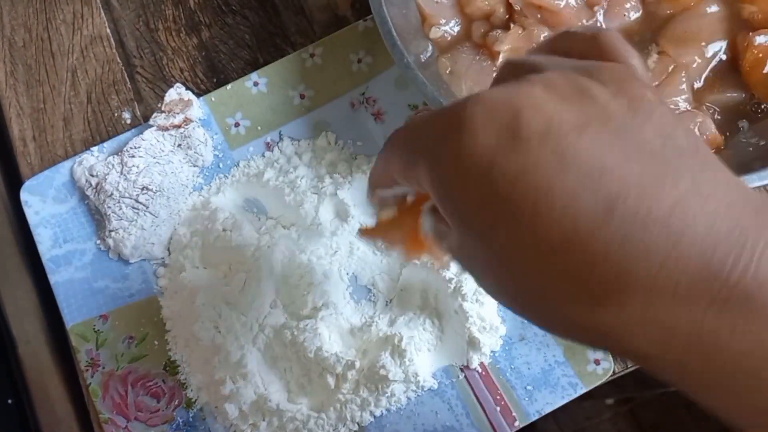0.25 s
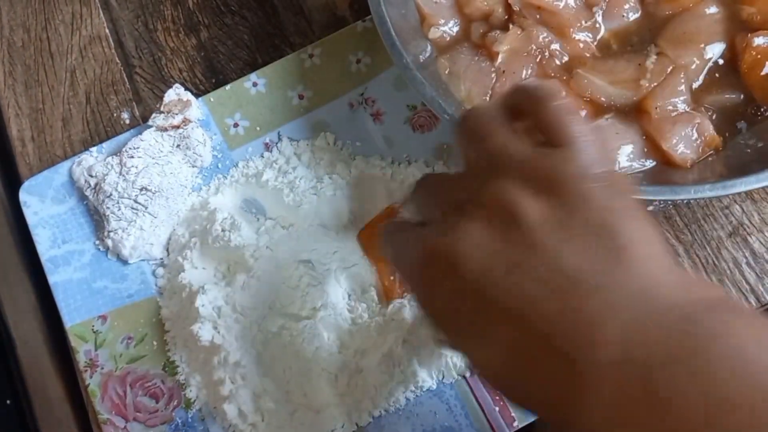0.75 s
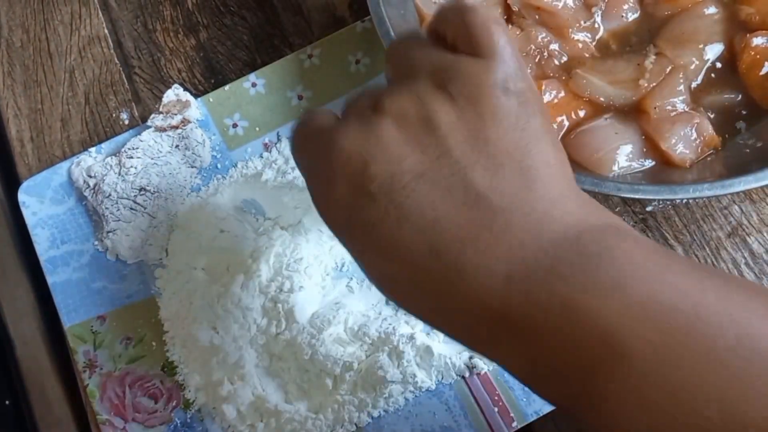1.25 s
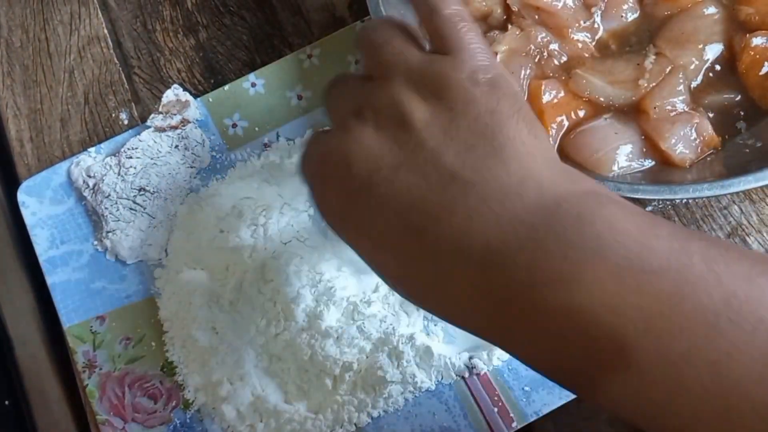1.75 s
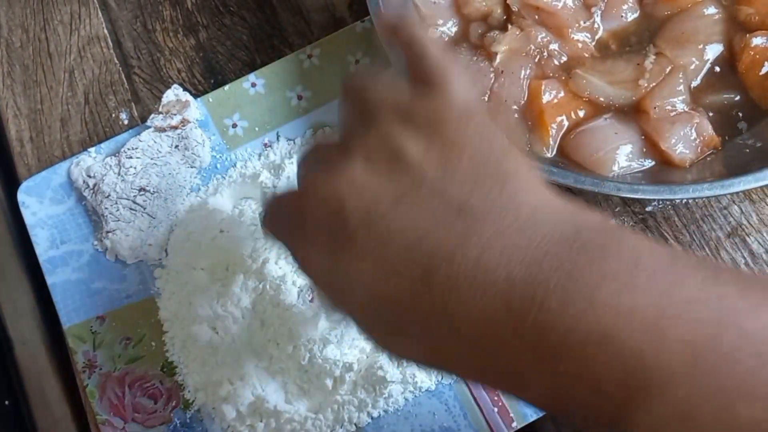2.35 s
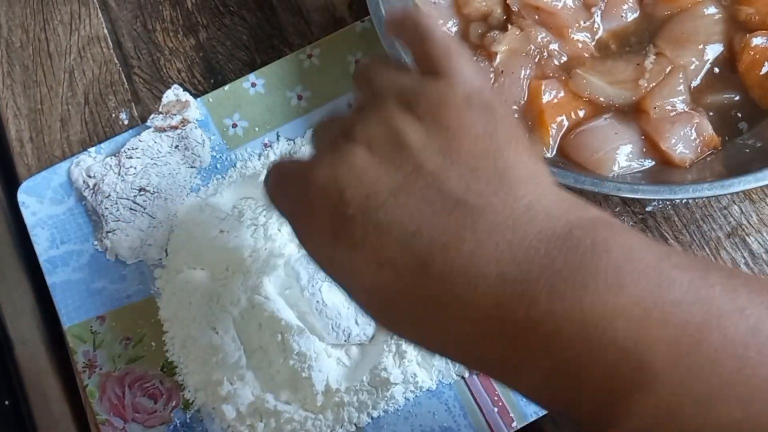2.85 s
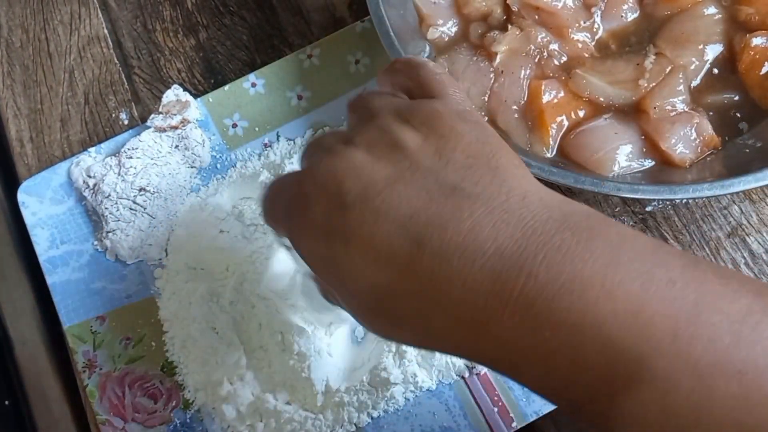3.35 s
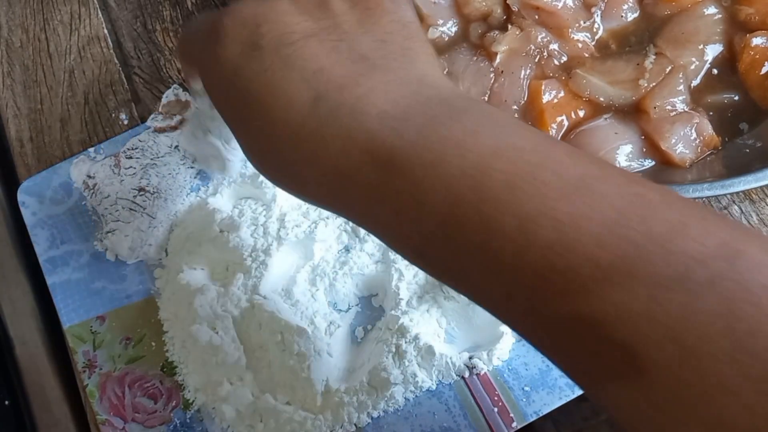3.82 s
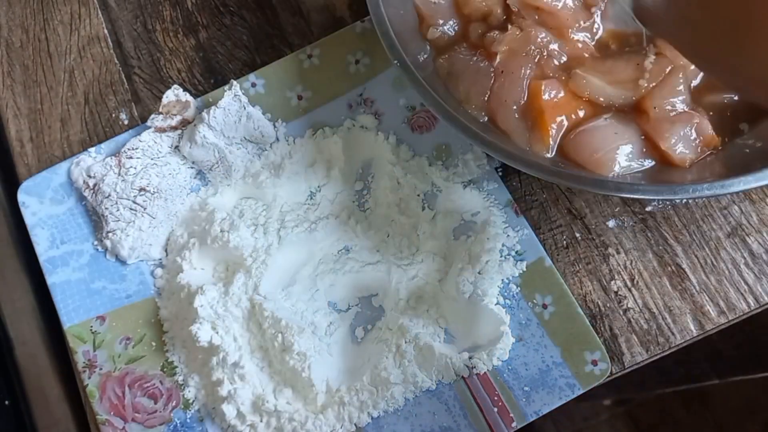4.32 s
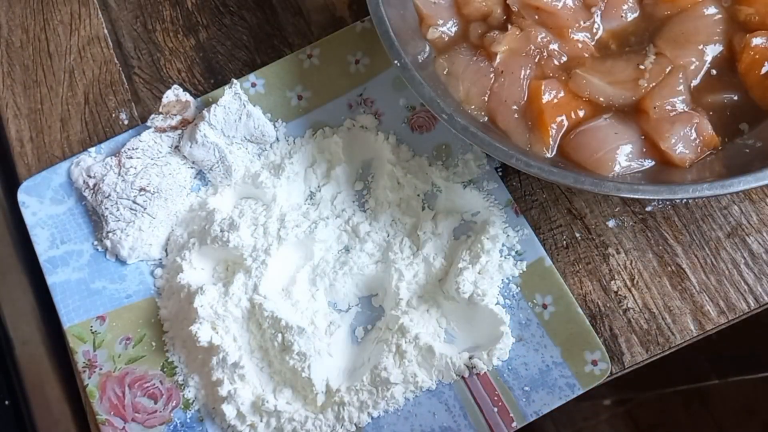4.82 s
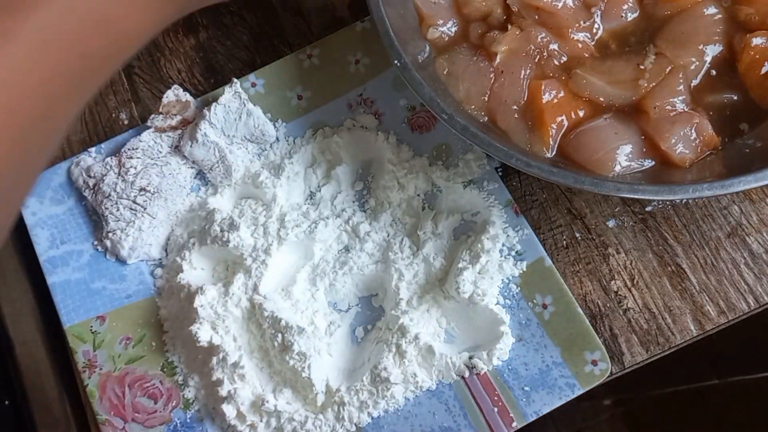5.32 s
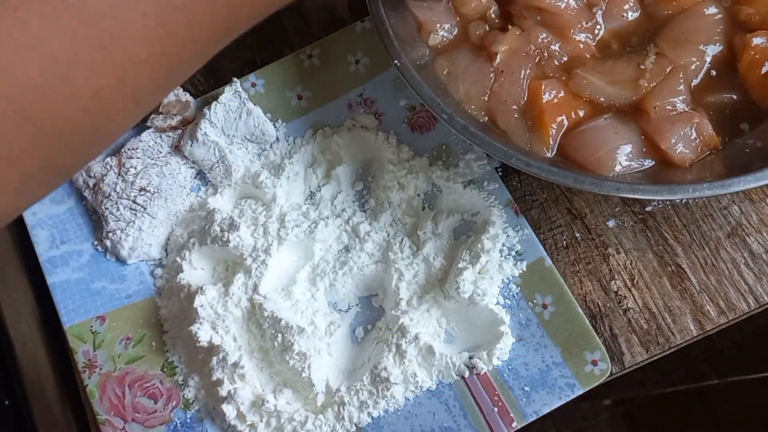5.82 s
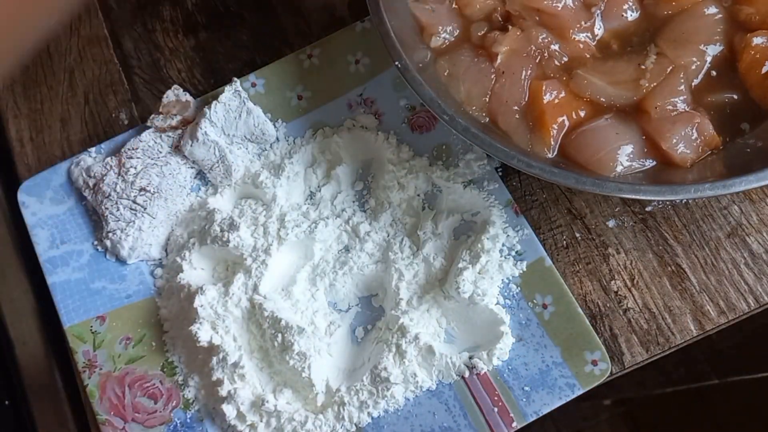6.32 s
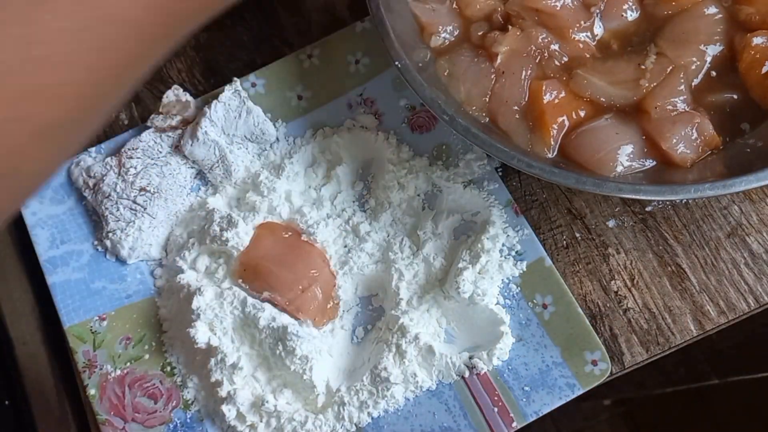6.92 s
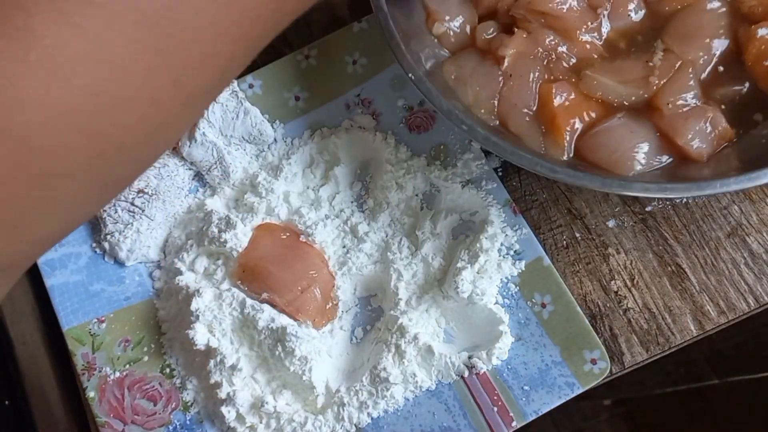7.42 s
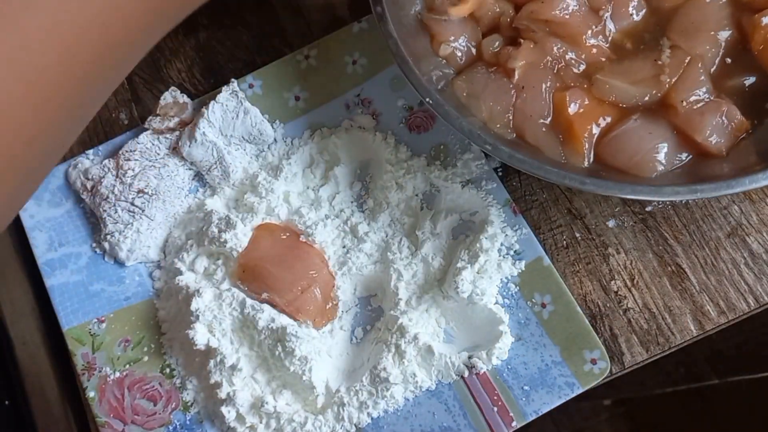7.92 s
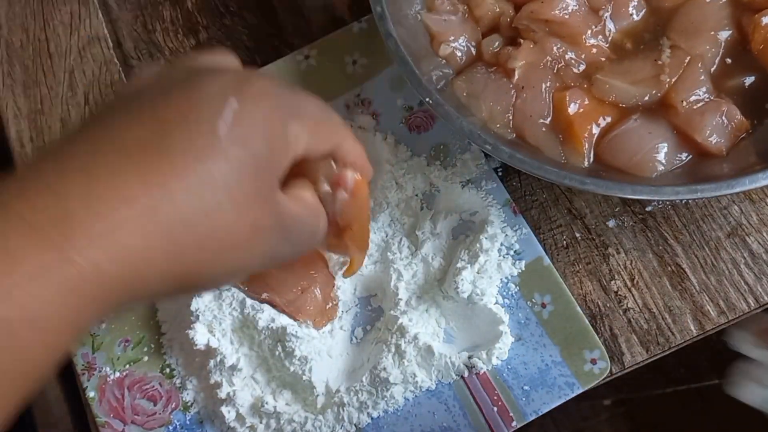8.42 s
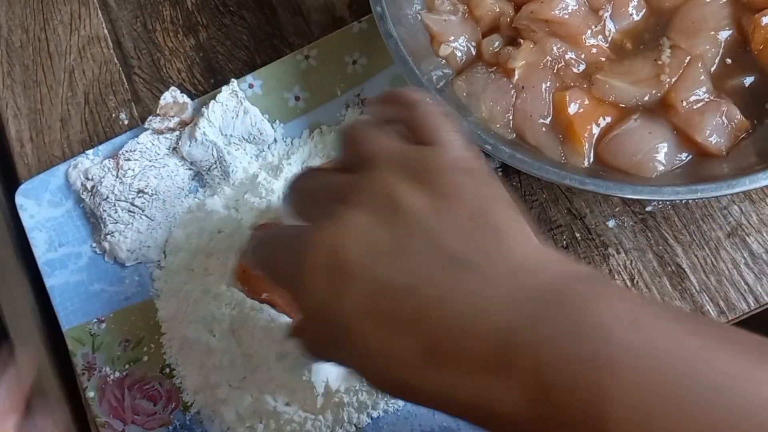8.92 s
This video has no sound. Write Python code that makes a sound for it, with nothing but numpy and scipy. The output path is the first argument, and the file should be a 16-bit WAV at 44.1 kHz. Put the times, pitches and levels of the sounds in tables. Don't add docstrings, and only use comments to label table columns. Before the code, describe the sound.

A small hard-walled kitchen, heard in stereo close to the sink. From 0 s to the end, at about 9 s, drops fall in rapid irregular clusters into standing water: crisp ticks, little sprays and high rising bubble pings, leaning left, with thin steel ringing and a short bright room tail. A muffled engine drones low through the walls, pulling suddenly around 2.5 s, more slowly toward 3.3 and 4.9 s with a hollow boom, then in weaker surges near 7 and 7.7 s before receding. A bright dry pop comes at 0.7 s; small wet meat smacks begin around 1.2 s and recur sparsely, gathering near 7 to 7.7 s, with a louder pop at 7.4 s. Starch swishes very faintly from 4.3 s, then softly at 5.1-5.6, 7.1 and 7.7-8.1 s. Light hiss lies beneath; drops continue to the end.

```python
import sys
import numpy as np
from scipy import signal
from scipy.io import wavfile
from scipy.ndimage import uniform_filter1d

SR = 44100
rng = np.random.default_rng(int(sys.argv[2]) if len(sys.argv) > 2 else 0)


def put_to_file(sound):
    columns = np.atleast_2d(sound).T
    safe = np.clip(columns, -1, 1)
    whole_steps = np.round(safe * 32767)
    wavfile.write(sys.argv[1], SR, whole_steps.astype(np.int16))


def ratio_of_db(decibels):
    return 10 ** (np.asarray(decibels, float) / 20)


N = 404397


def evened(x):
    return x / np.sqrt(np.mean(x ** 2) + 1e-20)


def read(points, hz):
    f, value = np.transpose(points)
    return np.interp(np.log(hz + 1), np.log(f + 1), value)


def curve(rows, column=1):
    return np.interp(np.arange(N) / SR, [r[0] for r in rows], [r[column] for r in rows])


def add(mix, s, sound):
    part = mix[round(s * SR):][:len(sound)]
    part += sound[:len(part)]


# f/Hz, left-right likeness [-1..1]
LIKENESS = [(60, 1), (130, 0.87), (290, 0.83), (640, 0.38), (1410, -0.19), (3100, -0.052), (6820, -0.1),
            (15000, -0.05)]


def wash(shape_db, size, patchy_db):
    hz = np.fft.rfftfreq(size, 1 / SR)
    frames = 4 * N // size + 5
    a, b, c, d, patches = rng.standard_normal((frames, len(hz), 5)).T
    patches = uniform_filter1d(patches, size=3, axis=0)
    patches = evened(uniform_filter1d(patches, size=6, axis=1))
    same = np.clip(read(LIKENESS, hz), -1, 1)[:, None]
    left, other = a + 1j * b, c + 1j * d
    z = np.array([left, same * left + np.sqrt(1 - same ** 2) * other])
    z *= ratio_of_db(shape_db(hz)[:, None] + patchy_db * patches)
    return evened(signal.istft(z, nperseg=size, noverlap=3 * size // 4)[1][:, :N])


# t/s of the top, level/dB of the swell, rise/s
SURGES = [
    (2.48, 10, 0.063),
    (3.32, 9, 0.58),
    (4.9, 10, 0.48),
    (6.76, 2, 0.77),
    (7.12, 7, 0.15),
    (7.739, 7, 0.16),
]


def surges():
    t, swell_db = np.arange(N) / SR, np.zeros(N)
    for top, db, rise in SURGES:
        shut = 0.072 + 0.065 * rise
        swell_db += db * np.interp(t, [top - rise, top, top + shut], [0, 1, 0])
    return swell_db


# t/s, level/dB
DRONE = [(0.0, -33), (0.3, -39.5), (1.1, -43.5), (2.4, -39.5), (3.65, -37), (4.45, -40), (5.1, -41.5),
         (6.6, -38), (7.5, -45), (8.1, -43), (9.17, -55.5)]
# f/Hz, level/dB per Hz
RUMBLE = [(12, -53), (20, -23), (43, -13.5), (68, -3.5), (86, 5), (132, 8), (143, -23), (157, -33),
          (170, -21), (220, -50), (370, -120)]
# f/Hz, level/dB per Hz
UPPER = [(88, -32), (150, -2.5), (172, -12.5), (214, -5.5), (248, -10), (303, -6.5), (425, -12),
         (661, -21.5), (721, -22), (1180, -24), (1500, -23), (1950, -31), (3300, -120)]
# f/Hz, width/Hz, level/dB
ROOM_MODES = [(53.4, 8.9, 6.5), (78.3, 41, 2.5), (87, 14, 5.5), (93.2, 53, 4.5), (111.9, 12.6, 7),
              (211, 6.9, 11), (232.3, 17, 1.5), (271, 5.7, 4)]


def drone():
    def modes(hz):
        return sum(db / (1 + (2 * (hz - f) / width) ** 2) for f, width, db in ROOM_MODES)

    def low_db(hz):
        return read(RUMBLE, hz) + modes(hz) - 80 * (hz > 175)

    def high_db(hz):
        return read(UPPER, hz) + modes(hz) - 80 * ((hz < 150) | (hz > 1600))

    level_db, swell_db = curve(DRONE), surges()
    low = wash(low_db, size=8192, patchy_db=0.0) * ratio_of_db(level_db - 2.0 + 0.5 * swell_db)
    high = wash(high_db, size=4096, patchy_db=3.5) * ratio_of_db(-53 + level_db + 41 + 0.26 * swell_db)
    return low + ratio_of_db(np.array([[-.7], [.7]])) * high


# t/s, f/Hz, level/dB
BOOM = [(0, 74, -44), (0.3, 75.6, -45), (0.6, 78, -56), (1.5, 82, -49.5), (2.2, 85, -43), (2.48, 90, -33),
        (2.62, 85, -45), (2.95, 83, -45), (3.07, 92, -35), (3.36, 92, -36), (3.5, 92, -54), (4.7, 92, -62),
        (4.82, 92, -32), (4.98, 91, -37.5), (5.15, 91, -59), (9.17, 91, -59)]


def boom():
    phase = 2 * np.pi * np.cumsum(curve(BOOM)) / SR
    return np.sqrt(2) * ratio_of_db(curve(BOOM, column=2)) * np.sin(phase)


# t/s, f/Hz, then level/dB of the fifth, third and eighth order
ORDERS = [(1.25, 26, -41, -58, -64), (1.55, 26.45, -42.5, -63, -64), (1.9, 26.32, -56, -65, -75),
          (2.3, 26.12, -54, -54, -52), (2.9, 25.38, -44.5, -42, -55), (3.22, 24.93, -43.5, -47, -51.5),
          (3.5, 24.6, -39, -57, -54), (4.28, 24.55, -46, -66, -62), (4.67, 24.89, -38.5, -61, -51),
          (5.01, 25.25, -49.5, -47, -55), (5.15, 25.37, -35, -53, -58.5), (5.81, 25.85, -36, -39, -49),
          (6.05, 26.16, -43.5, -42, -46), (6.7, 26.8, -48.5, -37, -54), (7.2, 27.07, -57, -42, -70),
          (7.6, 27.3, -57, -46, -64)]
# multiple of the firing f, level/dB
HARMONICS = [(2, -25), (3, -5), (4, -6), (5, -1), (6, -21), (8, -4.5), (9, -17.5), (10, -26), (11, -17.5),
             (12, -23.5)]


def firing():
    t, lines = np.arange(N) / SR, np.zeros(N)
    turns = 2 * np.pi * np.cumsum(curve(ORDERS)) / SR
    near = np.clip(np.minimum(t - ORDERS[0][0], ORDERS[-1][0] - t) / 0.72, 0, 1)
    shared_db = 0.13 * (curve(ORDERS, column=2) + 37.0) - 43.0
    own_column = {5: 2, 3: 3, 8: 4}
    for k, db in HARMONICS:
        waver_db = 4.65 * np.interp(t, np.linspace(0, N / SR, 40), rng.standard_normal(40))
        if k == 5:
            waver_db = 0
        order_db = curve(ORDERS, column=own_column[k]) if k in own_column else shared_db
        lines += ratio_of_db(db + waver_db + order_db) * np.sin(k * turns + rng.uniform(0, 5.14))
    return ratio_of_db(np.array([[-.7], [.7]])) * np.sqrt(2) * near * lines


# t/s, level/dB
AIR = [(0, -53.5), (1, -56.5), (2, -54.5), (2.6, -55.5), (4, -55.5), (4.6, -56), (6, -56.5), (7.5, -56),
       (8.15, -60.5), (8.45, -59.5), (9.17, -59)]
# f/Hz, level/dB per Hz
HISS = [(290, -30), (500, 3), (1180, -7), (1790, -2.5), (2130, -0.5), (2730, -6.5), (4090, -5.5),
        (6610, -9), (12500, -10), (15100, -10.5), (16000, -83)]


def air():
    return ratio_of_db(curve(AIR)) * wash(lambda hz: read(HISS, hz) - 60 * (hz < 450), size=512, patchy_db=2.5)


# t/s, level/dB
STROKES = [
    [(4.3, -90), (4.6, -69)],
    [(5.1, -60), (5.288, -56), (5.6, -55)],
    [(7.1, -59), (7.35, -60)],
    [(7.7, -59), (7.862, -53), (8.1, -57)],
]
# f/Hz, level/dB per Hz
POWDER = [(470, -10), (800, 7), (1140, -31), (1290, 0), (2240, 4), (4630, 2.5), (12000, 0), (16000, -2.5)]


def powder():
    t, stroke = np.arange(N) / SR, np.zeros(N)
    for rows in STROKES:
        fade = np.clip(np.minimum(t - rows[0][0], rows[-1][0] - t) / 0.22, 0, 1)
        stroke += fade * ratio_of_db(curve(rows) + 11.0)
    return stroke * wash(lambda hz: read(POWDER, hz), size=256, patchy_db=0.5)


# f/Hz, t60/s
KITCHEN = [(700, 0.78), (2000, 0.35), (4000, 0.29), (10000, 0.26), (16000, 0.37)]


def kitchen(x):
    out, turn = np.zeros((2, N)), np.arange(N) / SR / 0.89
    for k in range(3):
        taps = np.zeros((2, SR // 2))
        slots = np.arange(110, SR // 2 - 12, 12)
        at = slots + rng.integers(0, 12, (2, len(slots)))
        np.put_along_axis(taps, at, rng.choice([-1., 1.], at.shape), 1)
        hz, t, z = signal.stft(taps, SR, nperseg=128)
        room = ratio_of_db(-60 * t / read(KITCHEN, hz)[:, None])
        sink = ratio_of_db(15.5 - 60 * t / 0.011)
        tail = signal.istft(z * (room + sink), SR, nperseg=128)[1]
        tail /= np.linalg.norm(tail[0])
        share = np.sqrt(2 / 3) * np.cos(np.pi * (turn + k / 3))
        out += signal.oaconvolve((x * share)[None], tail, axes=1)[:, :N]
    return out


# f/Hz, level/dB
BASIN = [(2126, -85), (2428, -84), (2616, -68), (3472, -90), (3666, -73), (4027, -75.5), (4247, -78),
         (4576, -71), (6331, -75)]


def basin(x):
    t, ring = np.arange(SR // 3) / SR, 0
    for (hz, db), phase in zip(BASIN, rng.uniform(0, 2 * np.pi, (len(BASIN), 2, 1))):
        fall_db = 60 * t / 0.2 * (hz / 3000) ** 0.26
        ring = ring + ratio_of_db(db + 40 - fall_db) * np.sin(2 * np.pi * hz * t + phase)
    return signal.oaconvolve(x[None], ring * ratio_of_db(-8.5), axes=1)[:, :N]


# delay/s, level/dB
ECHOES = [
    (0.0113, -23),
    (.022, -20),
]


def echoes(direct):
    out = direct.copy()
    for (delay, db), pair in zip(ECHOES, (direct, direct[::-1])):
        out += ratio_of_db(db) * np.roll(pair, round(delay * SR), axis=1)
    return out


def bubbles(rows, cycles, glide, gain_db):
    out, t = np.zeros(N), np.arange(2000) / SR
    twins = rng.uniform(-1, 1, (len(rows), 2))
    for (s, db, hz), (size, late) in zip(rows, twins):
        fall_db = 60 * t * hz / cycles
        shape = ratio_of_db(db + gain_db - fall_db) * np.minimum(t * hz / 1.65, 1)
        add(out, s, shape * np.sin(2 * np.pi * hz * t * (1 + glide * fall_db / 60)))
        twin = 0.4 * shape * np.sin(2 * np.pi * hz * (1 + 0.05 * size) * t)
        add(out, s + 0.006 * (1.2 + late), twin)
    return out


# t/s, level/dB, f/Hz
POPS = [
    (0.7095, -29, 5500),
    (3.497, -35, 4700),
    (7.3957, -28.5, 3010),
    (7.399, -38, 6200),
]


def pops():
    return bubbles(POPS, cycles=79.0, glide=0.02, gain_db=-1.0)


# t/s, level/dB, f/Hz
SMACKS = [(1.709, -45, 1560), (3.794, -43, 1400), (4.129, -49, 1100), (7.026, -44, 1900), (7.153, -55, 934),
          (7.222, -47.5, 970), (7.379, -59, 880), (7.668, -57, 1300), (8.793, -61, 920), (1.635, -60, 1600),
          (2, -49, 1030), (6.3, -53, 1140), (4.735, -43, 1550), (7.6, -53, 1100), (1.225, -48, 1400)]


def smacks():
    clicks, t = np.zeros(N), np.arange(1200) / SR
    for (s, db, _), noise in zip(SMACKS, rng.standard_normal((len(SMACKS), len(t)))):
        add(clicks, s, ratio_of_db(db + 14.0 - 60 * t / 0.029) * noise)
    clicks = signal.lfilter(*signal.butter(2, [700, 2400], "band", fs=SR), clicks)
    return clicks + bubbles(SMACKS, cycles=12, glide=0.072, gain_db=22.0)


# t/s, tick level/dB, bubble level/dB, bubble f/Hz
DEEP = [(1.2229, -33, -36.5, 2370), (1.626, -38, -24, 3490), (1.6918, -32, -37, 5500),
        (1.9725, -41, -34, 4300), (2.244, -29.5, -37.5, 5230), (2.7921, -34, -38, 6700),
        (3.11, -29, -42, 7300), (3.1884, -47, -23.5, 3922), (3.4311, -34, -33, 3102),
        (4.0248, -32.5, -29, 4245), (4.078, -42, -31.5, 2410), (4.4945, -58, -47.5, 5330),
        (4.777, -32, -53, 7500), (5.9777, -49, -32, 3676), (6.426, -44, -29, 3600),
        (6.523, -40, -25.5, 3580), (7.3647, -42, -52, 5530), (7.7484, -40, -39, 4370),
        (8.6797, -47, -44, 4670), (8.8422, -32, -41, 4300)]
# t/s, tick level/dB, bubble level/dB, bubble f/Hz
MID = [(0.549, -51, -36, 2977), (0.5868, -31, -35, 4550), (0.693, -39.5, -33.5, 5040),
       (1.8285, -35.5, -32, 4910), (2.311, -33.5, -36.5, 4680), (2.9792, -39.5, -34, 4460),
       (3.1427, -38, -33.5, 4565), (3.2242, -34, -33, 4860), (3.2917, -40, -35, 2310),
       (3.657, -45, -33, 3132), (3.7058, -46, -31.5, 4900), (4.129, -46, -32.5, 4930),
       (5.0623, -38, -60, 6700), (5.0941, -43, -37.5, 4400), (6.2639, -34, -34, 4710),
       (6.9397, -37, -46, 4153), (7.012, -43, -34.5, 4720), (7.5386, -40, -50.5, 4600),
       (7.6464, -36.5, -58, 6520), (7.969, -38, -27, 3400), (9.0053, -43, -39, 5200)]
# t/s, tick level/dB, bubble level/dB, bubble f/Hz
RIM = [(0.0563, -44, -42, 6640), (0.708, -32, -40, 5870), (0.7457, -34, -37, 3980), (0.913, -52, -33, 3790),
       (1.112, -49, -31, 5160), (1.1367, -23.5, -37, 6350), (1.447, -40.5, -34, 2900),
       (2.203, -64, -39, 5960), (2.374, -31, -34.5, 5460), (3.036, -42, -29, 3290),
       (3.5192, -36, -32.5, 2580), (3.7887, -29.5, -34.5, 2095), (4.412, -34, -43.5, 4320),
       (4.8102, -39, -35.5, 4510), (4.9394, -35, -31, 4264), (5.3908, -37, -32, 2084),
       (5.683, -36, -31.5, 2966), (6.1908, -48, -30.5, 4470), (6.369, -42, -37.5, 3340),
       (7.67, -30.5, -34.5, 6370), (7.8346, -42, -35, 2520), (8.064, -42, -39, 3010),
       (8.1566, -57, -46.5, 6400), (8.5391, -40, -34.5, 4840), (8.607, -43, -45.5, 2600),
       (8.721, -52, -45.5, 3960), (8.7927, -46, -39, 2450), (8.8057, -42, -32.5, 6400),
       (8.896, -29.5, -23, 3600), (8.9519, -39, -35, 5860)]
# t/s, tick level/dB, tick f/Hz, spray level/dB
BARE = [(0.2344, -44, 8000, -48), (0.245, -29, 9600, -43.5), (0.485, -65.5, 8900, -56),
        (0.558, -45, 9400, -40), (1.1353, -33, 8000, -58), (1.483, -36, 7840, -52), (1.948, -72, 8000, -50),
        (2.3493, -35, 12560, -49.5), (2.6684, -27, 9240, -52), (2.7921, -33, 14000, -52),
        (2.83, -42, 13000, -45.5), (2.9146, -27, 9360, -48), (2.979, -44, 13480, -70),
        (3.061, -35, 12600, -54), (3.1428, -36, 12500, -52), (3.2243, -36, 13660, -51),
        (4.3298, -33, 13280, -54), (4.4951, -51, 8550, -58), (5.178, -31.5, 12400, -59),
        (5.752, -40, 12500, -51), (6.232, -37, 9030, -43.5), (6.671, -38.5, 9290, -58),
        (7.181, -52, 8994, -57), (7.2241, -36.5, 12500, -48), (7.383, -53, 10100, -42),
        (8.2054, -39, 12100, -56.5), (8.265, -38, 12300, -63), (9.1675, -46, 9100, -49),
        (4.727, -49, 8900, -52), (6.9452, -42, 9100, -49), (2.433, -53, 9000, -57),
        (3.787, -23.5, 12460, -62), (8.444, -55, 9000, -65)]


def impacts():
    rows = []
    for drops, hz in ((DEEP, 8000), (MID, 9040), (RIM, 12300)):
        for (s, db, bubble_db, _), chance in zip(drops, rng.uniform(-1.7, 1, len(drops))):
            spray_db = -41 + 0.31 * (db + 32.0) + 0.33 * (bubble_db + 30)
            rows.append((s, db, hz * (1 + 0.014 * chance), spray_db))
    return rows + BARE


# f/Hz, level/dB
SPLASH = [(900, -8.5), (1800, -3), (3000, -2.5), (6000, 2.5), (8000, 0), (12500, -2), (16000, -8)]


def ticks():
    tick, spray, t = np.zeros(N), np.zeros(N), np.arange(1500) / SR
    rows = impacts()
    crackle = rng.standard_normal((len(rows), len(t)))
    burst = 3.46 * ratio_of_db(-60 * t / 0.003) + 0.42 * ratio_of_db(-60 * t / 0.015)
    onset = np.minimum(t / 0.000087, 1)
    for (s, db, hz, spray_db), noise in zip(rows, crackle):
        add(tick, s - .0003, ratio_of_db(db - 3.5 - 60 * t / 0.0045) * np.sin(2 * np.pi * hz * t) * onset)
        add(spray, s - .0003, ratio_of_db(spray_db) * burst * noise)
    hz = np.linspace(0, SR / 2, 257)
    colour = signal.minimum_phase(signal.firwin2(511, hz, ratio_of_db(2 * read(SPLASH, hz)), fs=SR))
    return tick, signal.oaconvolve(spray, colour)[:N]


# t/s, level/dB, f/Hz
FREED = [(0.2337, -40, 2440), (0.2342, -39.5, 2790), (0.5597, -31, 2440), (0.6031, -42, 2520),
         (1.627, -35, 2530), (1.6894, -37.5, 2570), (1.7051, -35, 2810), (2.2444, -36, 2720),
         (2.8301, -40, 2650), (4.0276, -43, 2570), (4.7309, -42, 2300), (4.8173, -42.5, 2654),
         (5.4561, -35.5, 2900), (6.3699, -43.5, 2780), (6.5324, -37, 2440), (6.539, -33.5, 2810),
         (6.9441, -46, 2610), (6.9461, -51, 2053), (7.6691, -44, 2020), (7.9736, -35, 2660),
         (8.724, -49, 2580), (8.8985, -38, 2680),
         (0.6094, -30, 3050), (0.9172, -36, 3530), (1.1587, -30.5, 3150), (1.4497, -58, 3100),
                (1.83, -36, 3700), (2.3159, -35, 3840), (2.7945, -34, 3950), (2.8283, -25.5, 3230),
                (3.7915, -36.5, 4134), (4.0317, -26, 3520), (4.412, -41, 3990), (4.816, -33, 3650),
                (4.9391, -32, 3480), (5.6842, -45, 3000), (5.7561, -45, 4220), (5.9764, -40.5, 4030),
                (6.1906, -32.5, 3320), (6.4263, -39, 4140), (6.5227, -40, 4140), (6.9461, -28, 3530),
                (6.948, -46, 3790), (8.542, -51, 3580), (8.7218, -46, 3500),
         (0.558, -43, 5040), (0.604, -39, 6100), (1.113, -34, 6200), (1.1552, -31.5, 6170),
               (1.628, -40, 4680), (1.6546, -39, 6800), (3.4307, -38, 6220), (3.5247, -36.5, 5070),
               (3.658, -46, 5836), (5.685, -44.5, 4940), (6.2661, -38, 5650), (6.2663, -38, 5200),
               (6.3683, -42.5, 6890), (7.3717, -42, 4420), (7.552, -43, 4700), (7.6844, -31.5, 4950),
               (7.6856, -33, 5940), (7.9734, -39, 6580), (8.54, -37, 5040), (8.5521, -36, 6140),
               (8.7323, -50, 4450), (8.895, -36, 6600),
         (0.072, -58, 6800), (0.495, -48.5, 1970), (0.4955, -55, 5200), (0.63, -51, 2030),
        (0.915, -47.5, 2580), (1.17, -46.5, 2630), (1.24, -52, 1945), (2.349, -36, 3800),
        (2.433, -43.5, 6400), (3.042, -48, 6350), (3.295, -48, 6400), (3.82, -37.5, 2080),
        (4.083, -42, 5000), (4.122, -48, 2506), (4.415, -47, 5020), (4.497, -51, 4900), (5.063, -45, 3300),
        (5.69, -43, 2350), (6.205, -50, 4540), (6.232, -41, 4400), (6.2325, -40, 3600), (6.39, -50, 2940),
        (6.445, -41, 3912), (6.553, -36, 3320), (7.84, -44, 2520), (8.066, -52, 2550), (8.555, -45, 4560),
        (8.62, -42.5, 2650), (8.912, -32.5, 2850), (8.92, -35, 3680), (9.008, -41, 6130)]


def pings():
    rows = [(s + 0.001157, db, hz) for s, _, db, hz in DEEP + MID + RIM]
    rows += FREED
    large = [row for row in rows if row[2] < 2950]
    middle = [row for row in rows if 2950 <= row[2] < 3950]
    small = [row for row in rows if row[2] >= 3950]
    return (bubbles(large, cycles=31.0, glide=0.041, gain_db=4.5)
            + bubbles(middle, cycles=24.4, glide=0.031, gain_db=1.5)
            + bubbles(small, cycles=50.0, glide=0.028, gain_db=5.5))


def scene():
    lead = 15
    background = drone() + boom() + firing() + air() + powder()
    hand = smacks() + pops()
    hand_pair = np.array([np.roll(hand, lead), hand])
    ping = pings()
    tick, spray = ticks()
    left = ratio_of_db(6.0) * ping + ratio_of_db(5) * spray + ratio_of_db(10.0) * tick
    right = ratio_of_db(-4) * ping + ratio_of_db(1) * spray + ratio_of_db(1.5) * tick
    drops = echoes(np.array([left, np.roll(right, lead)]))
    room = ratio_of_db(7.5) * kitchen(ping + 1.2 * tick + 1.87 * spray + 0.08 * hand)
    room = room * ratio_of_db(np.array([[.6], [-.6]]))
    return background + hand_pair + room + basin(ping + 2.5 * spray) + drops


def low_pass(x):
    return signal.sosfilt(signal.butter(12, 16000, fs=SR, output="sos"), x)


def record(dry):
    edge = signal.firwin(401, 15600, fs=SR)
    limited = signal.oaconvolve(dry, edge[None], "same", axes=1)
    top = dry - limited
    quick, slow = (abs(uniform_filter1d(top ** 2, size=n, axis=1)) + 1e-16 for n in (100, 1500))
    sudden = np.clip(10 * np.log10(quick / slow) - 5.5, 0, 1)
    kept = ratio_of_db(-5) * uniform_filter1d(sudden, size=60, axis=1) * top
    return low_pass(limited + kept)


dry = scene()
out = record(dry)
put_to_file(out)
```